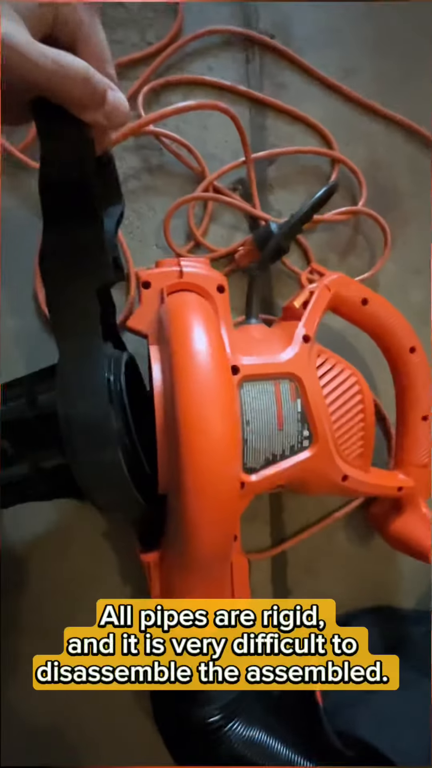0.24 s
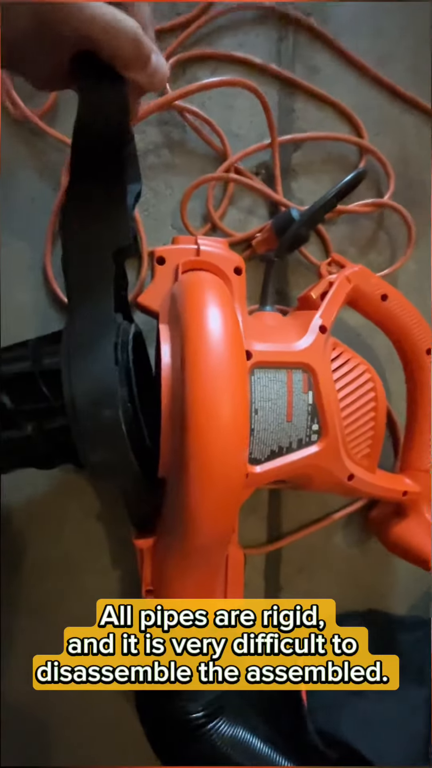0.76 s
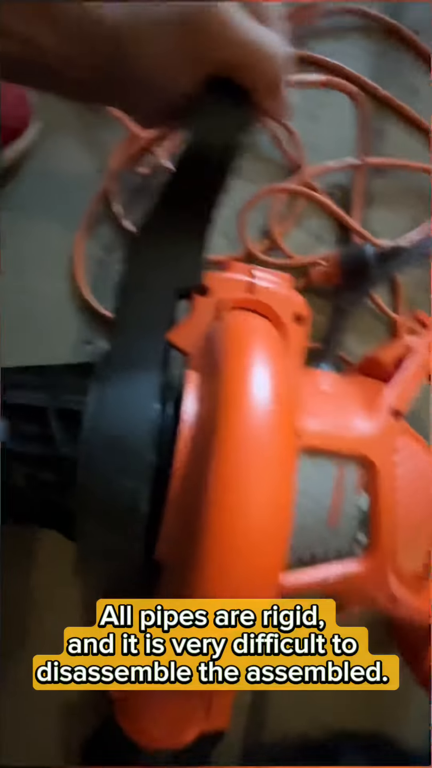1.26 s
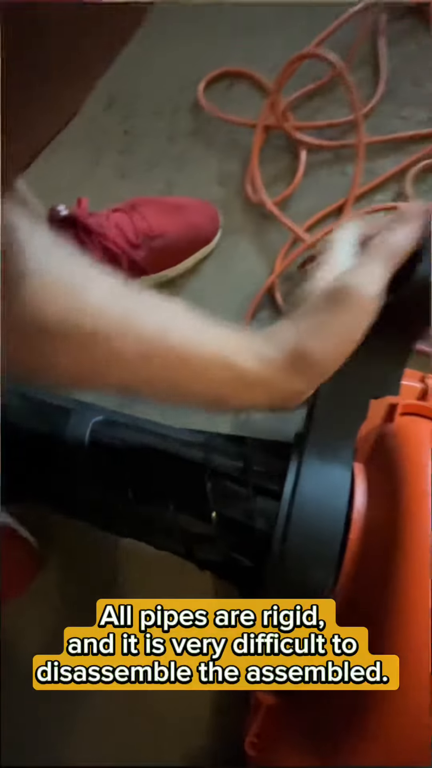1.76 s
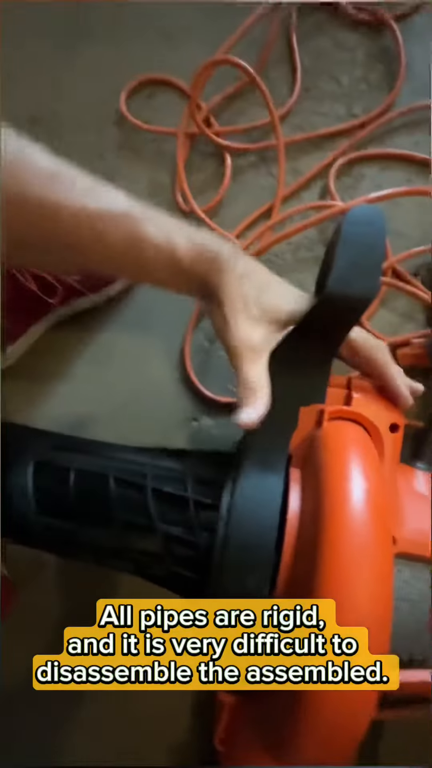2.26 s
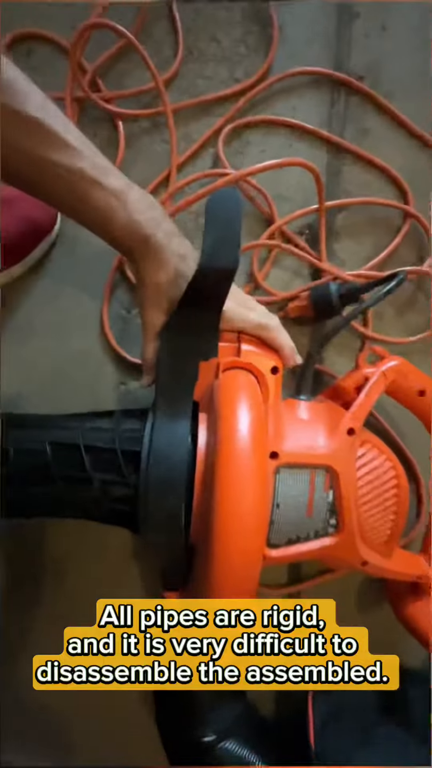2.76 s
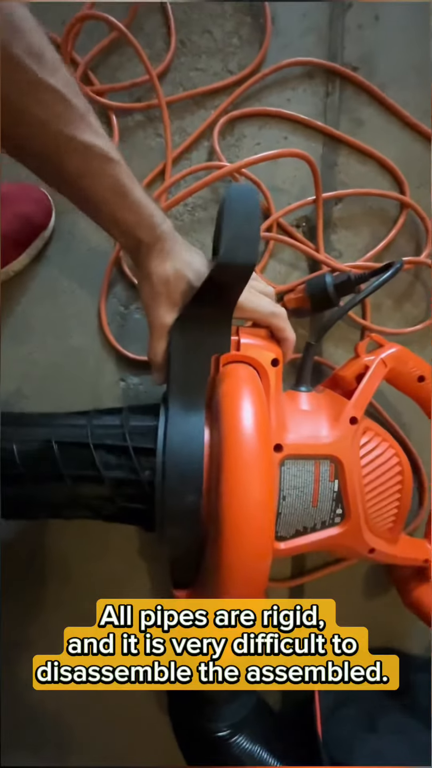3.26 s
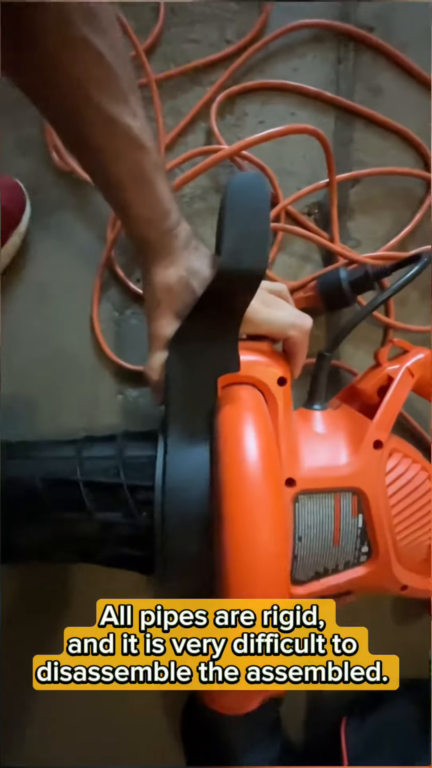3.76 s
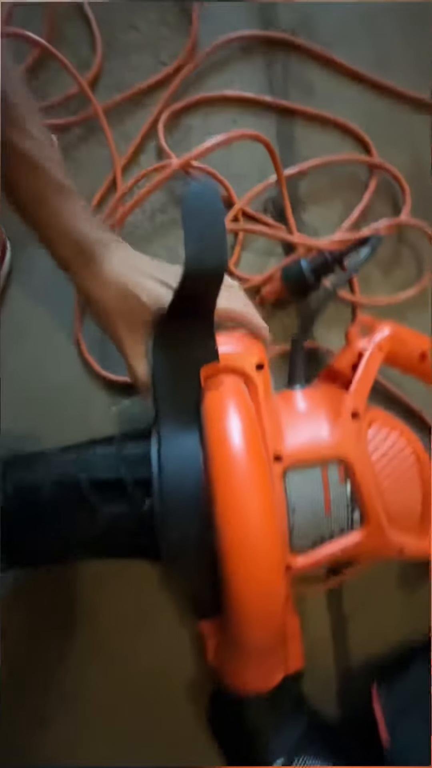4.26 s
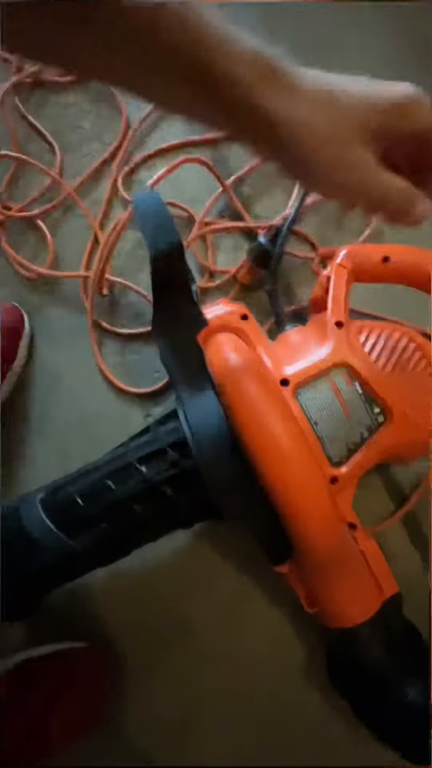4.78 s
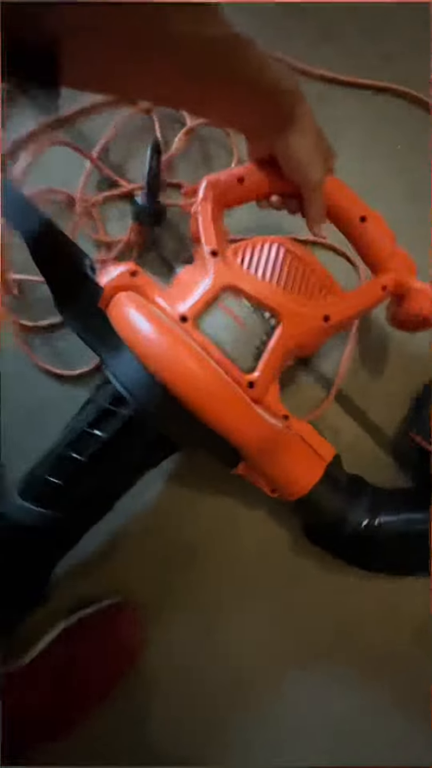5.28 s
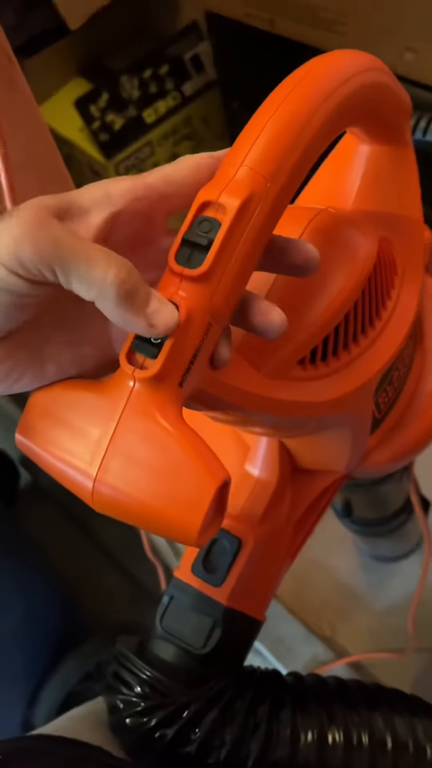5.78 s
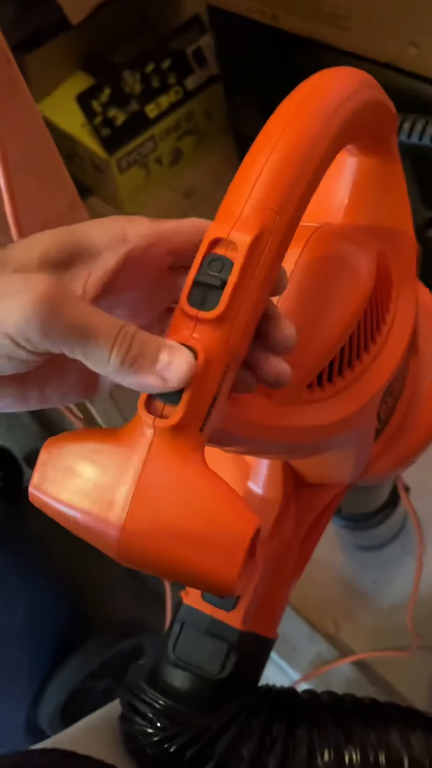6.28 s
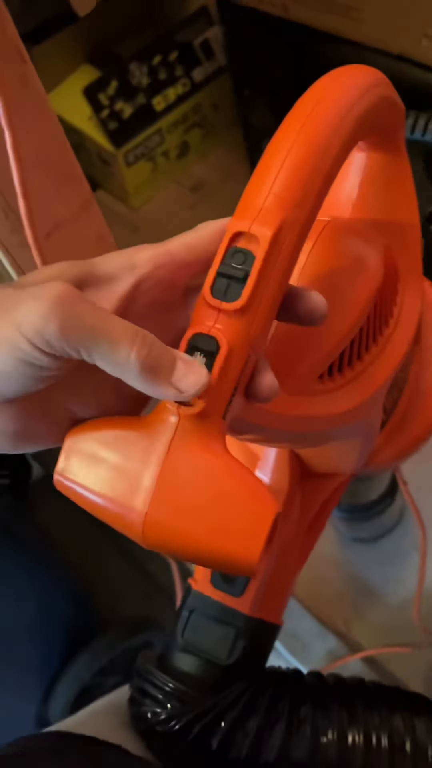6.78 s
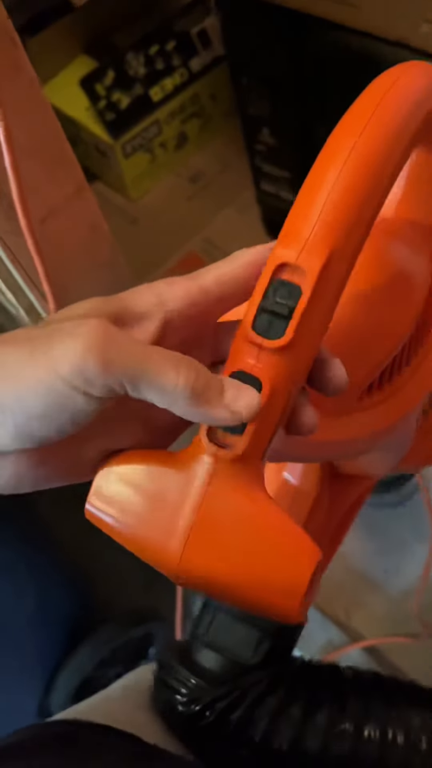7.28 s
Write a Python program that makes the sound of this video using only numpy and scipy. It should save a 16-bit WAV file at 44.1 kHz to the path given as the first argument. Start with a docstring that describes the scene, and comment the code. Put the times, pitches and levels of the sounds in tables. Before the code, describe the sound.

A faint deep rumble fills a bare, reverberant room. From 0.3 s, hands rub and rustle on stiff plastic close to the microphone, with small clicks and a firmer double knock around 0.8-1.0 s. A hollow clack at 1.6 s leaves a short, low pipe ring; light scraping and a bright tick follow near 2.1 s, then another strong ringing knock at 2.4 s. Dull clacks cluster around 3.0-3.2 s, and at about 3.65 s comes the loudest blow, a sharp snap with echo. After a pause, rubbing and knocks return at 4.3-4.6 s, with a low draught buffeting until about 5 s, then rustling and small scraping clicks. At 5.4 s a blower abruptly runs very close: broad rushing air, low motor hum and wavering whine, with brief whistles near 6 and 6.6 s. Its colour shifts around 6.8 s and its pitch climbs slightly, still running at 7.5 s.

```python
"""Leaf blower, fitted and running

A plastic guard is pushed onto an electric leaf blower in a bare, echoing room: noise strokes rub and rustle,
short bursts knock and snap through plastic resonances, random slips scrape, and a pipe rings as decaying tones.
Low noise makes a faint rumble and, as the machine is turned round, a draught brushing the microphone.
Then, abruptly, the blower runs close by: coloured noise rushes, and wavering tones hum, whine and whistle."""
import sys
import numpy as np
from scipy import signal
from scipy.fft import rfft, irfft, next_fast_len
from scipy.io import wavfile
from scipy.ndimage import uniform_filter1d, map_coordinates

SR = 44100
rng = np.random.default_rng(int(sys.argv[2]) if len(sys.argv) > 2 else 0)


def generate_wav(sig):
    """Save sig (samples, or channels by samples) to the path in sys.argv[1] as 16-bit PCM at SR."""
    pcm = np.round(np.clip(np.atleast_2d(sig).T, -1, 1) * 32767).astype(np.int16)
    wavfile.write(sys.argv[1], SR, pcm)


N = 332073  # length in samples


def amp(db):
    """Turn decibels into a gain."""
    return 10 ** (np.asarray(db) / 20)


def unit(x):
    """Scale a sound to an average (rms) strength of 1."""
    return x / np.sqrt(np.mean(x ** 2) + 1e-20)


def along(points, hz):
    """Read (f/Hz, value) points, joined by lines on a log frequency axis."""
    f, v = np.transpose(points)
    return np.interp(np.log(hz + 1), np.log(f + 1), v)


def curves(rows):
    """Give one value per sample for each column after the time."""
    s, *columns = np.transpose(rows)
    return [np.interp(np.arange(N) / SR, s, column) for column in columns]


def wobble(rate):
    """Draw a smooth random curve with this many random knots a second."""
    coarse = np.linspace(0, N, num=N // 32)
    knots = rng.standard_normal(int(N * rate / SR) + 4)
    smooth = map_coordinates(knots, [coarse * rate / SR])
    return np.interp(np.arange(N), coarse, smooth)


def ramp(start, length):
    """Step smoothly from 0 to 1."""
    u = np.clip((np.arange(N) / SR - start) / length, 0, 1)
    return u * u * (1 + 2 * (1 - u))


def swell(start, length, attack=0.22, release=0.33):
    """Rise, hold and ease off; attack and release are shares of the length."""
    rise = ramp(start, attack * length)
    fall = ramp(start + (1 - release) * length, release * length)
    return rise * (1 - fall)


def filtered(x, response):
    """Multiply each frequency of x by a response, which may also shift its phase."""
    n = x.shape[-1]
    m = next_fast_len(n + 8192)
    spectrum = rfft(x, m) * response(np.fft.rfftfreq(m, 1 / SR))
    return irfft(spectrum, m)[..., :n]


def colour(points):
    """Make a response from a (f/Hz, level/dB) spectrum."""
    return lambda hz: amp(along(points, hz))


def lifted(points, peaks):
    """Lift a broad spectrum at each (f/Hz, width/Hz, level/dB) resonance."""
    def response(hz):
        lift = sum(db * np.exp(-((hz - centre) / width) ** 2) for centre, width, db in peaks)
        return amp(along(points, hz) + lift)
    return response


def resonances(modes):
    """Add up (f/Hz, width/Hz, level/dB) resonances that ring only after a push, with alternating signs."""
    def response(f):
        return sum((-1) ** k * amp(db) * 1j * f * w / (c * c - f * f + 1j * f * w)
                   for k, (c, w, db) in enumerate(modes))
    return response


def spread(pair, alike):
    """Mix two unrelated signals into left and right of a given likeness."""
    def shares(hz):
        turn = np.arccos(np.clip(along(alike, hz), -1, 1)) / 2
        return np.array([np.cos(turn), np.sin(turn)])
    mid, side = filtered(pair, shares)
    return np.array([mid + side, mid - side])


def rush(response, alike, patchy_db):
    """Make coloured stereo noise of rms 1, with random patches of louder and softer in time and pitch."""
    z = signal.stft(rng.standard_normal((2, N)), nperseg=512)[2]
    field = rng.standard_normal(z.shape[1:])
    field = uniform_filter1d(uniform_filter1d(field, size=5, axis=0), size=10, axis=1)
    pair = signal.istft(z * amp(patchy_db * unit(field)), nperseg=512)[1][:, :N]
    return unit(filtered(spread(pair, alike), response))


# left-right likeness of sound from all round the room: f/Hz, likeness [-1 to 1]
DIFFUSE_ALIKE = [(120, 0.97), (300, 0.65), (700, 0), (15000, 0.032)]
# how long the echo takes to fall by 60 dB: f/Hz, time/s
ECHO_TIMES = [(120, 0.63), (400, 1.04), (1200, 1), (4000, 0.91), (8000, 0.78), (14000, 0.19)]


def room(x, build=0.00045):
    """Bare walls return a diffuse tail that builds up (time constant in s) and dies soonest in the top treble."""
    hz, t, z = signal.stft(rng.standard_normal((2, SR)), SR, nperseg=256)
    decay = amp(-60 * t / along(ECHO_TIMES, hz)[:, None])
    tail = signal.istft(z * decay * (1 - np.exp(-t / build)), SR, nperseg=256)[1]
    tail = spread(tail, DIFFUSE_ALIKE)
    return signal.fftconvolve(x, tail / np.linalg.norm(tail[0]), axes=1)


LULL_S, LULL_DB = 4.95, -15  # when the rumble drops away, and by how much
# shape of the room's background: f/Hz, relative level/dB
RUMBLE_COLOUR = [(25, -39), (55, -1), (110, 1), (180, -11.5), (400, -13.5), (1500, -68)]


def room_rumble(rumble_db=-53.0):
    """The room rumbles faintly: deep noise, nearly the same in both ears at the bottom."""
    background = rush(colour(RUMBLE_COLOUR), [(120, 0.88), (700, 0.067)], patchy_db=1.5)
    return amp(rumble_db + LULL_DB * ramp(LULL_S, length=0.11)) * background


STROKE_ATTACK, STROKE_RELEASE = 0.28, 0.54  # shares of a stroke's length
GRIP_RUB_DB, GRIP_RUSTLE_DB = -55, -75  # relative levels; the hand never rests entirely
# shape of the dull rub: f/Hz, relative level/dB
RUB_COLOUR = [(30, -23), (100, -2.5), (200, 9.5), (400, 3.5), (600, 3), (1050, 4), (2000, -5.5),
              (3500, -15), (9000, -33)]
# plastic resonances under the rubbing: f/Hz, width/Hz, lift level/dB
CREAK_PEAKS = [(443, 19, 7), (2300, 110, 3)]
# shape of the bright rustle: f/Hz, relative level/dB
RUSTLE_COLOUR = [(1500, -5.5), (3500, 2.5), (7000, -7.5), (10500, -2), (12500, -17.5), (15500, -8.5)]
# strokes of hands and parts sliding: start t/s, length/s, relative rub level/dB, relative rustle level/dB
HAND_STROKES = [(0.298, 0.83, -52, -77), (0.42, 0.17, -46, -65.5), (0.503, 0.65, -50.5, -66),
                (0.736, 0.19, -42.5, -56.5), (0.908, 0.17, -39, -51.5), (1.346, 0.78, -47.5, -52),
                (1.877, 0.64, -48.5, -52.5), (2.403, 0.4, -51, -70), (2.973, 0.052, -36, -69),
                (4.053, 0.25, -46, -60), (4.235, 0.27, -41, -48.5), (4.474, 0.42, -49.5, -61),
                (4.92, 0.061, -67, -48.5), (5.013, 0.17, -54.5, -53.5), (5.124, 0.55, -43.5, -55)]


def rubbing(rub_db=-1, catch_db=2, rustle_catch_db=3.0, room_db=-5):
    """Plastic slides on plastic and skin, catching unevenly; every stroke swells, holds and eases off."""
    rub = rush(lifted(RUB_COLOUR, CREAK_PEAKS), DIFFUSE_ALIKE, patchy_db=3.5)
    rub = rub * amp(catch_db * wobble(70))
    rustle = rush(colour(RUSTLE_COLOUR), DIFFUSE_ALIKE, patchy_db=1.0)
    rustle = rustle * amp(rustle_catch_db * wobble(81))
    low, high = amp(GRIP_RUB_DB), amp(GRIP_RUSTLE_DB)
    for start, length, low_db, high_db in HAND_STROKES:
        speed = swell(start, length, STROKE_ATTACK, STROKE_RELEASE)
        # where strokes overlap, the stronger one counts
        low = np.maximum(low, amp(low_db) * speed)
        high = np.maximum(high, amp(high_db) * speed)
    direct = amp(rub_db) * low * rub + high * rustle
    return direct + amp(room_db) * room(direct)[:, :N]


def strike(t, force, response, db, snap=5):
    """A snap in a gritty contact reaches the microphone; a plain click of equal energy goes to the walls."""
    grit = spread(rng.standard_normal((2, len(t))), [(400, 0.069), (1200, 0.4), (4000, 0.026)]) * force
    near = filtered(grit + snap * (t == 0), response)
    near = amp(db) * near / abs(near).max()
    far = filtered(1. * (t == 0), response)
    return near, far * np.linalg.norm(near[0]) / np.linalg.norm(far)


# resonances of the stiff plastic wall: f/Hz, width/Hz, relative level/dB before a small random change
WALL_MODES = [(409, 180, -4), (883, 275, -3), (1107, 254, -0.5), (1396, 550, -1.5), (1767, 1130, -7),
              (3500, 330, -10.5)]


def wall(soft_hz, spot_hz, vary_db=1.0, spot_db=5, spot_q=6):
    """Each spot adds its own pitch to the wall's resonances; a soft contact leaves out the high ones."""
    plastic = resonances([(hz, width, db + rng.normal(0, vary_db)) for hz, width, db in WALL_MODES])
    spot = resonances([(spot_hz, spot_hz / spot_q, spot_db)])

    def response(f):
        softness = 1 - (f / soft_hz) ** 2 + 1j * np.sqrt(2) * f / soft_hz
        return plastic(f) * (1 + spot(f)) / softness
    return response


FLEX_LAG_S = 0.00408  # the body answers a moment after the contact
# ringing of the hollow casing: f/Hz, relative level/dB, time to fall 60 dB/s
CASING_MODES = [(74.7, 2.5, 0.13), (194, -3.5, 0.21), (250, 0.5, 0.12), (354.5, 0.5, 0.085), (479, -7, 0.2),
                (880, 1, 0.087), (957, 3, 0.026)]


def boom(t, hz, ring_db=-6, detune_db=6, flex_t60=0.067, flex_rise=0.0048):
    """The struck panel flexes a moment late and rings the casing, favouring modes near its own pitch."""
    late = np.maximum(t - FLEX_LAG_S, 0)
    flex = np.sin(2 * np.pi * hz * late) * amp(-60 * late / flex_t60)
    ring = 0
    for f, db, t60 in CASING_MODES:
        mode_db = db - detune_db * abs(np.log2(f / hz)) - 60 * late / t60  # weaker per octave away
        ring = ring + amp(mode_db) * np.sin(2 * np.pi * f * late)
    return (flex + amp(ring_db) * ring) * (1 - np.exp(-late / flex_rise))


# shape of the bright tick: f/Hz, relative level/dB
TICK_COLOUR = [(900, -14), (2000, 7), (3300, 15.5), (4800, 15), (7000, 4), (10500, 7), (15500, -15.5)]
# contacts: t/s, relative clack level/dB, relative boom level/dB, relative tick level/dB,
# boom f/Hz, clack f/Hz, contact time/s, scrape-in time/s
CONTACTS = [(0.294, -39, -59, -49, 305, 1090, 0.0028, 0.0012),
            (0.498, -34, -52, -57, 300, 1160, 0.0033, 0.0065),
            (0.836, -21.5, -24, -40.5, 325, 1560, 0.0063, 0.0018),
            (0.962, -23, -21.5, -35.5, 226, 1350, 0.0063, 0.0035),
            (1.061, -29, -38, -73, 272, 1450, 0.0028, .003), (1.206, -41, -34, -54, 250, 895, 0.0033, .005),
            (1.619, -16.5, -20.5, -32.5, 210, 996, 0.003, 0.00062),
            (2.120, -30, -34, -29, 250, 1020, 0.005, 0.00027),
            (2.355, -32, -44, -49, 194, 1020, 0.0075, 0.002),
            (2.419, -13, -21.5, -29, 209, 890, 0.0045, 0.00012),
            (2.445, -28, -20.5, -35.5, 194, 910, .003, 0.0032),
            (2.932, -23.5, -25, -67, 262, 1020, 0.0054, .00052),
            (2.996, -19, -22.5, -40.5, 339, 400, 0.0098, 0.0065),
            (3.166, -28, -36.5, -70, 353, 1110, 0.0025, 0.00047),
            (3.197, -18, -30, -50, 330, 900, 0.01, 0.0027),
            (3.566, -28, -30.5, -64, 381, 1050, .0098, 0.0026),
            (3.600, -34, -22.5, -47.5, 213, 900, .0091, 0.0055),
            (3.633, -8, -6, -17, 323, 470, 0.014, 0.0024),
            (3.645, 7, -12.5, -3, 200, 2040, 0.00063, 0.00083),
            (3.662, -2, -28, -8, 223, 1660, 0.012, 0.0083), (4.350, -42, -32, -60, 138, 480, 0.0066, .006),
            (4.432, -14, -21.5, -31.5, 205, 1300, 0.0065, 0.00037),
            (4.474, -28, -21.5, -37, 215.5, 850, 0.0025, 0.0055),
            (4.609, -25, -43, -53, 398, 850, 0.0038, .0005),
            (5.234, -23.5, -43, -52, 409, 586, 0.013, .002),
            (5.291, -27.5, -55, -55, 417, 1400, 0.002, 0.0003)]


def knocks(tick_db=8, boom_db=4, room_db=-6.5, boom_room_db=-11, hard_hz=11000, hard_db=11):
    """Each contact scrapes in, clacks and ticks in the plastic wall, and booms in the hollow casing."""
    lead = SR // 12  # samples before the contact
    t = np.arange(-lead, SR // 3) / SR
    direct, sent = np.zeros((2, N)), np.zeros((4, N))
    for k, (s, db, low_db, high_db, hz, spot_hz, contact, scrape) in enumerate(CONTACTS):
        force = np.exp(-abs(t / np.where(t < 0, scrape, contact)))
        # little tick means a soft, dull contact
        soft_hz = hard_hz * 2 ** ((high_db - db) / hard_db)
        clack, far_clack = strike(t, force, wall(soft_hz, spot_hz), db)
        tick, far_tick = strike(t, force, colour(TICK_COLOUR), high_db + tick_db)
        body = amp(low_db + boom_db) * boom(t, hz)
        span = round(s * SR) - lead + np.arange(len(t))
        direct[:, span] += clack + tick + body
        # successive blows reach the walls by different paths
        sent[k % len(sent), span] += amp(room_db) * (far_clack + far_tick) + amp(boom_room_db) * body
    return direct + sum(room(path[None])[:, :N] for path in sent)


# left-right likeness of the scrapes: f/Hz, likeness [-1 to 1]
SCRAPE_LIKENESS = [(1000, 0.77)]
# a part sticks and sings as it slides: start t/s, length/s, f/Hz, width/Hz, level/dB before the swell
SINGING_SLIDES = [(0.44, .11, 1250, 1300, -47), (0.765, .08, 1700, 900, -48), (1.63, .14, 1820, 250, -46),
                  (1.99, .13, 1040, 120, -49), (2.115, .045, 1000, 90, -39), (1.96, .36, 1900, 400, -53),
                  (4.29, .13, 1000, 700, -47), (4.3, .36, 2450, 400, -55), (4.3, .3, 4500, 700, -53),
                  (5.19, .26, 2150, 600, -51)]


def scrapes(slips_per_s=1300, room_db=-7):
    """Irregular tiny slips ring one resonance of the sliding part, with wandering pitch and uneven catching."""
    t = np.arange(SR // 2) / SR
    direct = np.zeros((2, N))
    wander, catching = 1 + .02 * wobble(18), amp(2 * wobble(45))
    for start, length, hz, width, db in SINGING_SLIDES:
        span = round(start * SR) + np.arange(len(t))
        slips = rng.standard_normal((2, len(t))) * (rng.random(len(t)) < slips_per_s / SR)
        rings = filtered(spread(slips, SCRAPE_LIKENESS), lambda f: 1 / (1 + 2j * f / width) ** 2)
        # a sine moves the slow ringing up to the part's pitch
        carrier = np.sin(2 * np.pi * np.cumsum(hz * wander[span]) / SR)
        band = unit(rings * catching[span] * carrier)
        push = np.sin(np.pi * np.minimum(t / length, 1))
        direct[:, span] += amp(db) * push * band
    return direct + amp(room_db) * room(direct)[:, :N]


# air column and thin wall of the pipe: f/Hz, relative level/dB, time to fall 60 dB/s before damping
PIPE_MODES = [(209, -1.5, 0.92), (471, -13.5, 0.99), (1020, -20, 0.34)]
# the pipe is set ringing as the guard seats against it: contact t/s, relative level/dB
PIPE_BLOWS = [(1.619, -32), (2.419, -32.5)]


def pipe():
    """The pipe rings on after a blow until the hand damps it."""
    t = np.arange(SR // 3) / SR
    ring = sum(amp(db - 60 * t / t60) * np.sin(2 * np.pi * hz * t) for hz, db, t60 in PIPE_MODES)
    ring = ring * np.cos(np.pi / 2 * (t / t[-1]) ** 2)  # the damping hand
    out = np.zeros(N)
    for s, db in PIPE_BLOWS:
        out[round((s + FLEX_LAG_S) * SR) + np.arange(len(t))] += amp(db) * ring
    return out


# shape of the wind noise: f/Hz, relative level/dB
BUFFET_COLOUR = [(22, -17), (48, 12), (96, 2), (425, -14), (714, -25.5), (1000, -51), (1500, -110)]
# the draught as the machine is swung round: t/s, relative deep level/dB, relative upper level/dB
DRAUGHT_LEVELS = [(4.41, -90, -90), (4.45, -33, -17.5), (4.6, -27, -24), (4.67, -22, -16.5),
                  (4.77, -19.5, -22.5), (4.87, -26, -31), (4.96, -29, -42), (5.15, -93, -92)]


def draught(deep_hz=110):
    """Moving air buffets the two microphone ports in opposite senses, its deep and upper parts separately."""
    air = rush(colour(BUFFET_COLOUR), [(60, -.9), (250, -.8), (700, -.3)], patchy_db=.5)
    air = air * amp(1.5 * wobble(70))
    deep = filtered(air, lambda hz: 1 / (1 + (hz / deep_hz) ** 4))
    deep_db, upper_db = curves(DRAUGHT_LEVELS)
    return amp(deep_db) * deep + amp(upper_db) * (air - deep)


TILT_S, TILT_TAKES_S = 6.81, 0.36  # the running blower tilts in the hand: middle and length
ROAR_DB, ROAR_TILT_DB = 2, 0.5  # gain, and its change with the tilt
HISS_DB, HISS_TILT_DB = -31.5, -2  # relative level, and its change with the tilt
ASIDE_S, ASIDE_TAKES_S = 6.77, 0.48  # the outlet turns aside: start and length
# broad shape of the rush: f/Hz, relative level/dB
AIR_COLOUR = [(30, -40), (60, -4.5), (250, -9.5), (530, -5), (850, 0), (1180, -3.5), (1800, -5.5),
              (2200, -1), (2700, -5), (4000, -10.5), (5100, -7), (8000, -14), (11000, -18), (15500, -26.5)]
# housing and hose resonances: f/Hz, width/Hz, lift level/dB
DUCT_PEAKS = [(192.7, 48.5, 14), (310, 50, 8.5), (448, 70, 12.5), (645, 44, 12), (739, 49, 6),
              (879, 47, 5.5), (1050, 55, 6.5), (1258, 53, 6.5), (1512, 110, 9), (1658, 21, 11.5),
              (2130, 31, 4)]
# left-right likeness of the blower's air: f/Hz, likeness [-1 to 1]
NEAR_ALIKE = [(60, 0.96), (200, 0.88), (1400, 0.69), (4000, 0.76), (6000, 1), (15000, 1)]
# strength of the low rush through the housing: t/s, relative level/dB
ROAR_LEVELS = [(5.5, -31), (5.9, -30), (6.5, -30), (6.73, -27), (7.0, -29.5), (7.5, -28)]
# change of the rush as the outlet turns aside: f/Hz, change of level/dB
ASIDE_COLOUR = [(70, -4.5), (200, 1), (290, 1.5), (430, 2), (550, -2.5), (700, -1), (880, -3.5),
                (1100, -0.5), (1270, -2), (1650, -4.5), (2000, 1)]


def air_rush(split_hz=1200):
    """Turbulence roars low and hisses high through the resonant housing, changing as the machine turns."""
    tilt = ramp(TILT_S - TILT_TAKES_S / 2, TILT_TAKES_S)
    roar_db, = curves(ROAR_LEVELS)
    housing = lifted(AIR_COLOUR, DUCT_PEAKS)
    low_share = lambda hz: 1 / (1 + (hz / split_hz) ** 8)
    roar = rush(lambda hz: housing(hz) * np.sqrt(low_share(hz)), NEAR_ALIKE, patchy_db=.9)
    hiss = rush(lambda hz: housing(hz) * np.sqrt(1 - low_share(hz)), NEAR_ALIKE, patchy_db=.3)
    air = amp(roar_db + ROAR_DB + ROAR_TILT_DB * tilt) * roar
    air = air + amp(HISS_DB + HISS_TILT_DB * tilt) * hiss
    return air + ramp(ASIDE_S, ASIDE_TAKES_S) * (filtered(air, colour(ASIDE_COLOUR)) - air)


def tone(hz):
    """A tone of rms near 1 wavers in pitch and strength in the turbulent air."""
    phase = 2 * np.pi * np.cumsum(hz + wobble(20)) / SR
    return np.sqrt(2) * np.sin(phase) * (1 + .15 * wobble(16))


def facing(at, span):
    """A tone is beamed past the microphone as the machine turns: 1 at its closest, 0 far from it."""
    return np.exp(-((np.arange(N) / SR - at) / span) ** 2)


MAINS_HZ = 60
SHAFT_HZ, CLIMB_S, CLIMB_HZ_PER_S = 187.4, 6.85, 4.6  # steady speed, then a slow climb from CLIMB_S
# shaft hum, blade whine and its mains sidebands: shaft multiple, mains multiple added,
# relative level/dB, t/s when it faces the microphone, spread of that in time/s, lift level/dB
SHAFT_LINES = [(1, 0, -42, 6.15, .5, 4), (2, 0, -48, 6.5, .6, 5), (3, 0, -48, 5.8, .7, 13),
               (6, 0, -61, 7.3, .3, 16), (7, -1, -61, 6.4, .3, 18), (9, 0, -56, 6.4, .55, 10),
               (12, 0, -51, 7, .55, 10), (12, 1, -60, 6.15, .7, 12), (12, 2, -51, 6.4, .5, 2),
               (12, 3, -59, 5.9, .9, 9), (18, 0, -68, 7.35, .35, 20), (24, 1, -58, 6.5, .6, 6)]


def hum_and_whine():
    """The shaft hums and the fan blades whine; each tone swells and fades as the machine turns."""
    t = np.arange(N) / SR
    shaft_hz = SHAFT_HZ + CLIMB_HZ_PER_S * np.maximum(t - CLIMB_S, 0)
    return sum(amp(db + lift_db * facing(at, span)) * tone(order * shaft_hz + side * MAINS_HZ)
               for order, side, db, at, span, lift_db in SHAFT_LINES)


# whistles of the housing: f/Hz, relative level/dB at the loudest, t/s when loudest, spread in time/s
HOUSING_WHISTLES = [(1652, -42, 6.03, .2), (1453, -43, 6.6, .13)]


def whistles():
    """The housing whistles as the air catches it."""
    return sum(amp(db) * facing(at, span) * tone(hz) for hz, db, at, span in HOUSING_WHISTLES)


START_S = 5.435  # the blower is suddenly heard
# how far left runs ahead of right: f/Hz, phase/radians
LEFT_LEAD = [(50, 0), (1200, -.2), (2150, .4), (2700, 2.2), (4400, 1.2), (6200, 3.2), (9000, 6.3),
             (12500, 9.4), (15500, 12.8)]


def blower(rise=0.012):
    """Air, shaft, fan and housing reach the two microphone ports at slightly different moments."""
    t = np.arange(N) / SR

    def lead(hz):
        angle = np.interp(hz, *np.transpose(LEFT_LEAD))
        return np.exp(.5j * np.outer([1, -1], angle))
    ports = filtered(air_rush() + hum_and_whine() + whistles(), lead)
    balance = amp([[-.6], [.6]])  # dB, left and right
    return ports * balance * np.clip((t - START_S) / rise, 0, 1)


def gain_control(x, threshold_db=-31, release=0.042, slope=0.61):
    """The gain ducks after a loud blow and creeps back, which flattens the start of its echo."""
    keep = np.exp(-1 / (release * SR))
    power = signal.lfilter([1 - keep], [1, -keep], np.mean(x ** 2, axis=0))
    excess_db = np.maximum(10 * np.log10(power + 1e-12) - threshold_db, 0)
    return x * amp(-slope * excess_db)


def scene():
    """Handling first, under the gain control, then the running machine, over the room's rumble."""
    handling = rubbing() + knocks() + scrapes() + pipe()
    return room_rumble() + gain_control(handling) + draught() + blower()


TOP_HZ = 15800  # band limit


def record(dry):
    """Nothing is kept above the band limit."""
    return filtered(dry, lambda hz: hz < TOP_HZ)


dry = scene()
out = record(dry)
generate_wav(out)
```